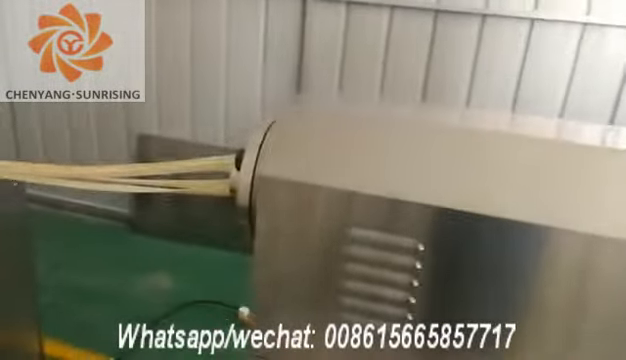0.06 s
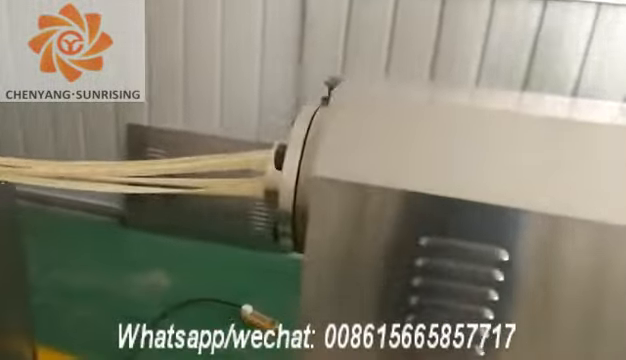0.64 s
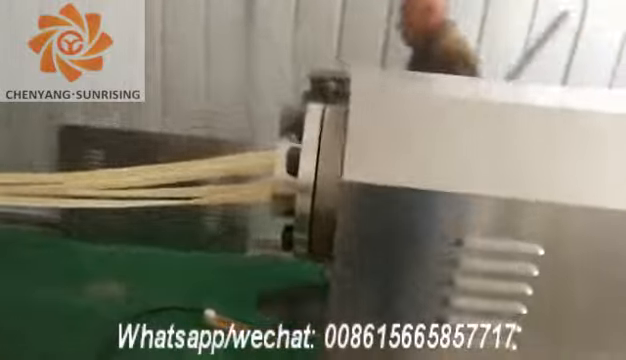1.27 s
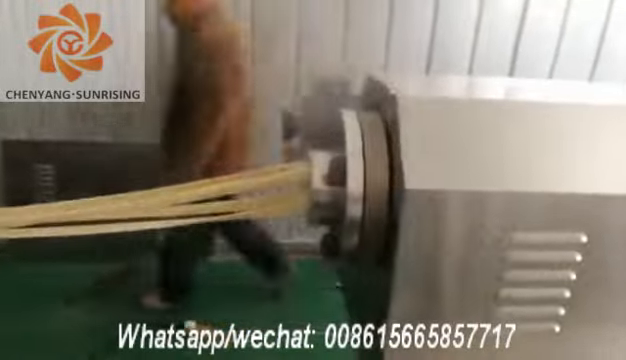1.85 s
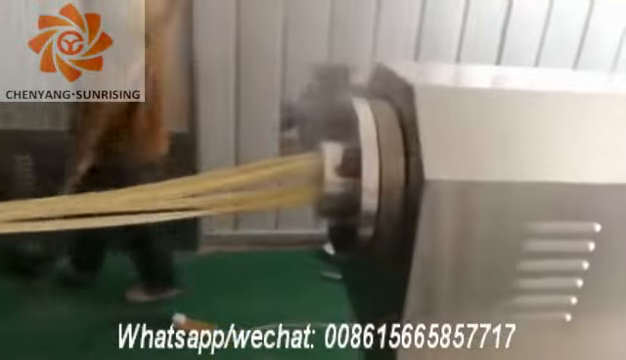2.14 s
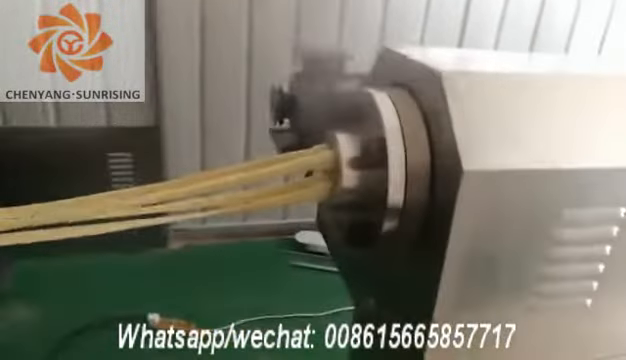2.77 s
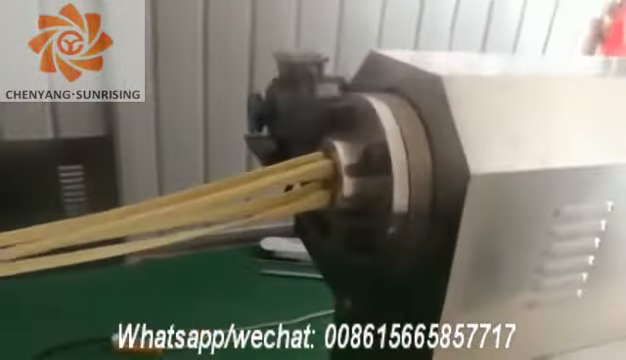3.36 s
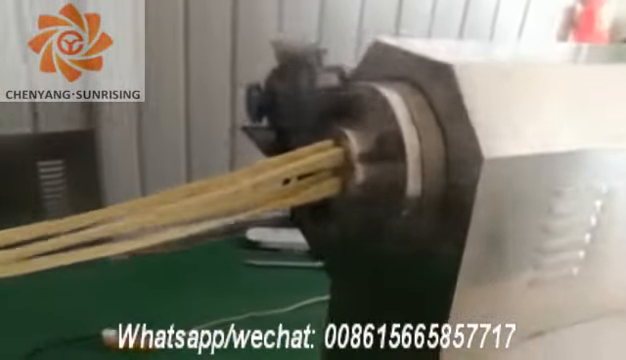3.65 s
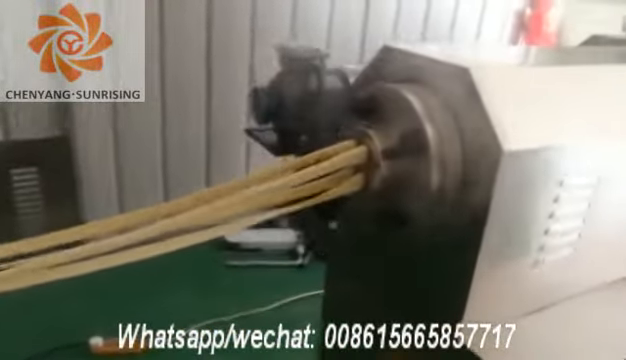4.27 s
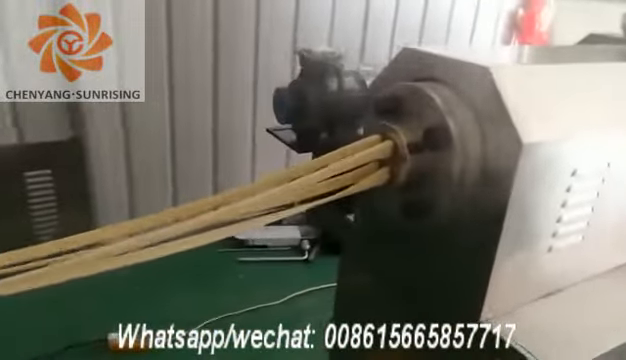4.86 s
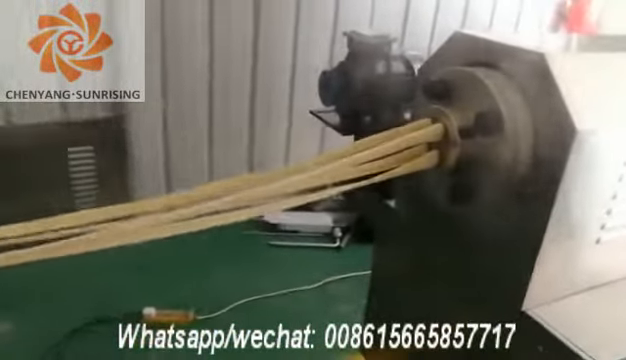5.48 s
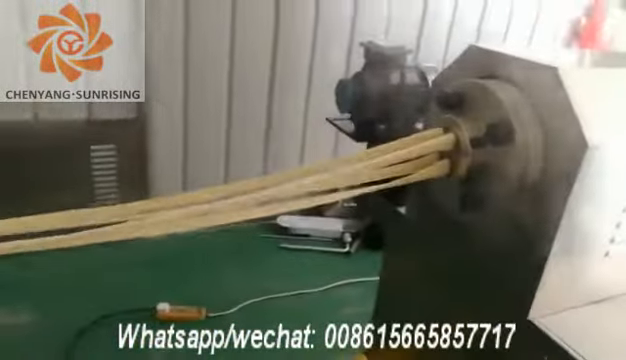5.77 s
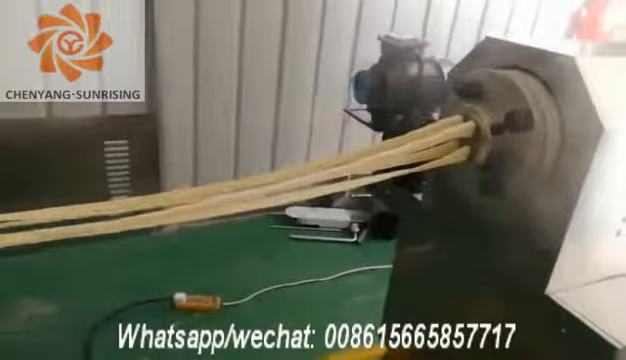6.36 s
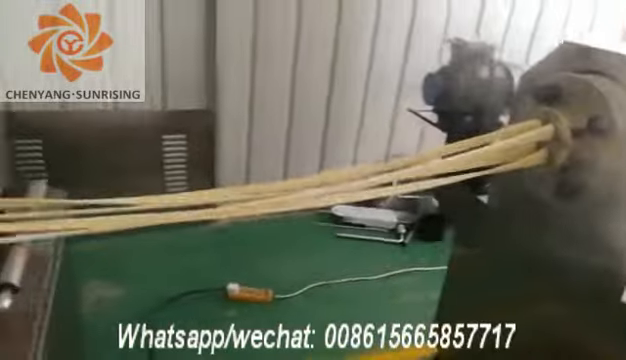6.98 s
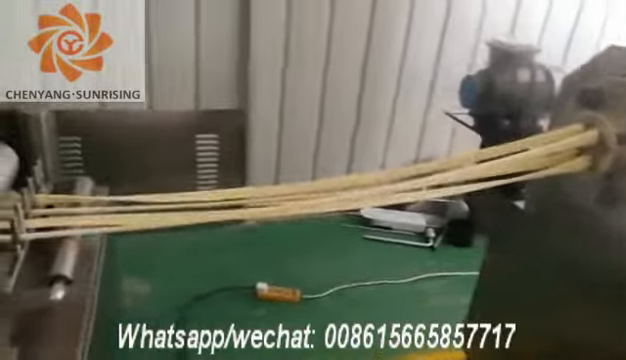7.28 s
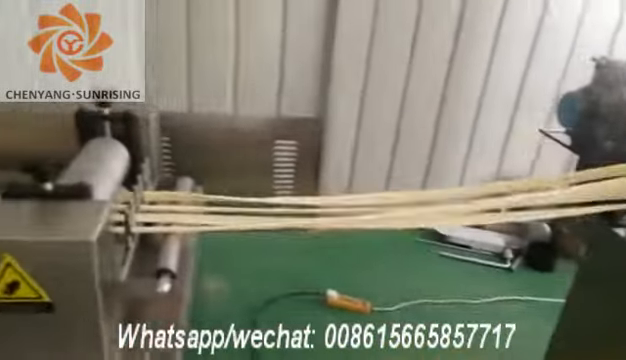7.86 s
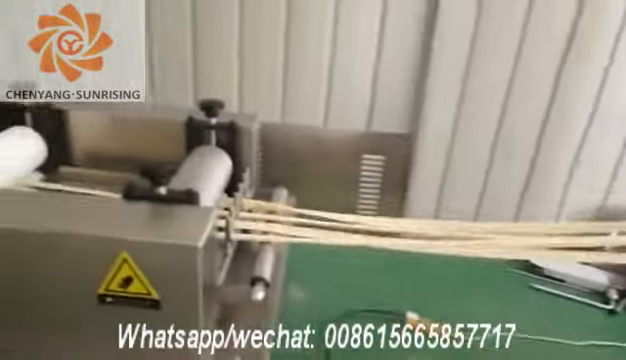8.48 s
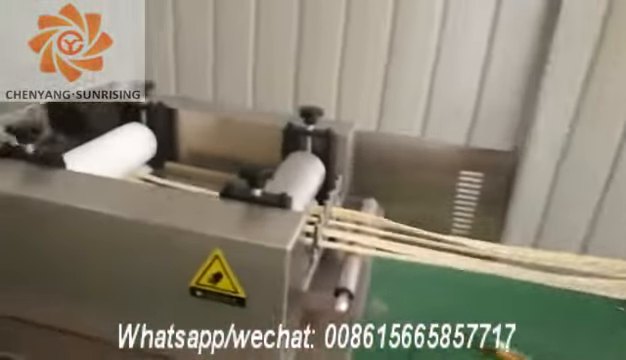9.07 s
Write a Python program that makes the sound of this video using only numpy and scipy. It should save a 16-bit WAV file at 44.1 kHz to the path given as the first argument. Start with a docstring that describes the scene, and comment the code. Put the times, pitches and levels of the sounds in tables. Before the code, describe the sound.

A piercing electric whine from a dough-extruding machine continues from start to finish, shimmering and shifting slightly in strength. Beneath it the drive drones, gears hum and steam sizzles lightly, all within the broad rumble of a factory hall. The microphone moves slowly near the machine, which sounds a little to the right, so its tones gently swell and fade.

```python
"""A high, buzzing whine near 4 kHz sits over the hum, rumble and hiss of a factory hall.
It comes from the motor of a snack extruder, a machine that pushes dough through a shaped opening (the die).
The motor's power supply switches rapidly, making a row of evenly spaced tones. Each swells and fades on
its own as two microphones move through the loud and quiet spots left by the hall's echoes.
Underneath, gears hum, the drive drones and steam hisses at the die."""
import sys
import numpy as np
from scipy import signal
from scipy.io import wavfile
from scipy.ndimage import uniform_filter1d

SR = 44100
rng = np.random.default_rng(int(sys.argv[2]) if len(sys.argv) > 2 else 0)


def unload_wav(signal):
    """Save mono or channel-first audio to the path in sys.argv[1] as 16-bit WAV at rate SR, clipped to [-1, 1]."""
    wavfile.write(
        sys.argv[1],
        SR,
        np.round(np.clip(np.atleast_2d(signal).T, -1, 1) * 32767).astype(np.int16),
    )


N = 402633
T = np.arange(N) / SR
WHINE_HZ, SPACING_HZ = 3972.6, 55.37  # a "step" is one spacing up or down from WHINE_HZ
WHINE_LAG_S = .00057  # the whine reaches the left microphone this much later


def gain_of(db):
    """Turns decibels into a number to multiply a sound by."""
    return 10 ** (np.asarray(db) / 20)

def evened(x):
    """Scales a signal to an average power of 1."""
    return x / np.sqrt(np.mean(abs(x) ** 2) + 1e-20)

def at_pitch(table, hz):
    """Looks up a frequency table, blending between rows on a musical (log) scale."""
    row_hz, value = np.transpose(table)
    return np.interp(np.log(hz + 1), np.log(row_hz), value)

def follow(table, t):
    """Looks up every column of a time table at the times t."""
    times, *columns = np.transpose(table)
    return np.array([np.interp(t, times, column) for column in columns])

def level(curve, t=T):
    """A level curve in dB at the times t."""
    return follow(curve, t)[0]

def band_db(hz, centre, width, order=4):
    """The shape of a flat-topped band in dB; a wider band spreads the same power thinner."""
    return -10 * np.log10(width * (1 + (2 * (hz - centre) / width) ** order))

def random_waves(*shape):
    """Waves of random strength and phase, as complex numbers."""
    return (rng.standard_normal(shape) + 1j * rng.standard_normal(shape)) / np.sqrt(2)

# How alike the two microphones sound: (frequency [Hz], likeness [0-1])
MIC_LIKENESS = [(100, .985), (190, .965), (280, .85), (450, .2), (1200, .25), (2000, 0), (5500, .1),
                (7000, .85), (8500, .94), (11000, .6), (14000, .45)]
def mic_pair(waves, hz):
    """Blends two unrelated signals into what two nearby microphones hear."""
    same = np.clip(at_pitch(MIC_LIKENESS, hz), 0, .999)
    return np.array([waves[0], same * waves[0] + np.sqrt(1 - same ** 2) * waves[1]])

# Which side is louder: (frequency [Hz], left minus right [dB])
MIC_BALANCE = [(120, 0.5), (700, -4), (1800, -1.5), (3000, -5.5), (5000, -10), (8000, -1), (13000, -.6)]
def sides(hz):
    """Left and right gain: the machine stands to the right."""
    return gain_of(np.multiply.outer([.5, -.5], at_pitch(MIC_BALANCE, hz)))[:, None]

def fading(rate_hz):
    """Times and two random flutters: 24 echoes add and cancel along a walk that is fastest at first."""
    t = np.linspace(0, T[-1], 1024)
    path = t + 2.614 * (1 - np.exp(-t / 2.242))
    doppler = rate_hz * rng.standard_normal((2, 24, 1))  # moving shifts each echo's pitch a little
    echoes = random_waves(*doppler.shape) * np.exp(2j * np.pi * doppler * path)
    return t, evened(echoes.sum(1))

def sine(hz, t, envelopes):
    """A pure tone at each microphone; a slow complex envelope sets its strength and phase."""
    phase = (2 * np.pi * (hz * T % 1)).astype(np.float32)
    cos, sin = np.cos(phase), np.sin(phase)
    channels = [np.interp(T, t, z.real) * cos - np.interp(T, t, z.imag) * sin for z in envelopes]
    return np.sqrt(2) * np.array(channels)

def hall_tone(hz, db, direct, rate_hz, lag_s=0.):
    """A machine tone: a steady direct part, lag_s later on the left, plus its fading echoes."""
    t, echoes = fading(rate_hz)
    arrival = np.exp(2j * np.pi * (rng.random() - hz * np.array([[lag_s], [0]])))
    envelopes = evened(mic_pair(direct * arrival + echoes, hz))
    return gain_of(db) * sine(hz, t, envelopes)

def noise(shape_db, patchy_db, size=1024):
    """Stereo noise of power 1, shaped by shape_db(t, hz), with random louder and softer patches."""
    hz = np.fft.rfftfreq(size, 1 / SR)
    t = np.arange(N * 4 // size + 5) * size / 4 / SR
    patches = uniform_filter1d(rng.standard_normal((len(t), len(hz))), size=12, axis=0)
    patches = evened(uniform_filter1d(patches, size=12, axis=1))
    spectrum = mic_pair(random_waves(2, len(t), len(hz)), hz)
    spectrum = spectrum * gain_of(shape_db(t, hz) + patchy_db * patches) * sides(hz)
    _, sound = signal.istft(spectrum.swapaxes(1, 2), nperseg=size, noverlap=size * 3 // 4)
    return evened(sound[:, :N])


# One short puff of hiss: (time [s], half-width [s], midrange lift [dB], fizz lift [dB])
HISS_PUFF = (3.1, 0.063, 4.1, 5.1)
def puff(t):
    """How far the puff lifts the hall's midrange and the steam's fizz, in dB."""
    at, half_width, mid_db, fizz_db = HISS_PUFF
    return np.multiply.outer([mid_db, fizz_db], np.exp(-((t - at) / half_width) ** 2))

# Machine noise filling the hall: (frequency [Hz], relative level [dB])
HALL_SPECTRUM = [(20, -17), (45, -61), (75, -3), (130, -16), (175, -1.5), (280, -5.5), (500, -14),
                 (720, -12), (1000, -14.5), (2200, -15), (3200, -16), (5600, -21.5), (9000, -32.5),
                 (15500, -45)]
# Swells of the low rumble and the drone: (time [s], level change [dB])
RUMBLE_SWELL = [(0.0, -1), (0.6, -1.5), (2.84, 1), (3.04, -2.5), (3.79, 2.5), (4.29, -1), (6.74, 1.9),
                (7.28, -1.5), (9.13, 0.3)]
# Swells of the higher machine noise and the hum: (time [s], level change [dB])
MACHINERY_SWELL = [(0.0, -0.5), (2.74, 1.5), (5.19, -0.3), (6.69, 1.2), (7.43, -0.5), (9.13, 0.6)]
def hall():
    """Rumble and broad machine noise, each swelling as the microphones pass."""
    def shape_db(t, hz):
        rumble_db = level(RUMBLE_SWELL, t) - 4
        machinery_db = level(MACHINERY_SWELL, t) + puff(t)[0]
        low = 1 / (1 + (hz / 380) ** 4)  # 1 in the bass, 0 in the treble
        return at_pitch(HALL_SPECTRUM, hz) + low * rumble_db[:, None] + (1 - low) * machinery_db[:, None]
    return gain_of(-32) * noise(shape_db, patchy_db=1.5, size=2048)

# Low tones of the drive and frame: (frequency [Hz], relative level [dB])
DRONE_TONES = [(116, -52), (146, -46), (167, -44), (179, -45), (220, -54), (291, -49)]
def drone(recede_db_per_s=.47):
    """Low tones waver with the uneven load on the dough screws and fade as the walk leaves the drive."""
    tones = sum(hall_tone(hz, db, direct=.37, rate_hz=2.2) for hz, db in DRONE_TONES)
    return gain_of(.77 * level(RUMBLE_SWELL) - recede_db_per_s * T) * tones

# Steam hiss at the die: (frequency [Hz], relative level [dB])
STEAM_SPECTRUM = [(4000, -34), (6400, -12.5), (7000, -4.5), (7500, -1.5), (7950, -3), (8700, -5),
                  (9400, -12.5), (10500, -20), (12000, -22.3), (15500, -28)]
# Sizzle near 8 kHz; the hiss bands and the whine's octave follow it too: (time [s], level change [dB])
SIZZLE_SWELL = [(0.0, -0.5), (1.85, -0.2), (2.05, -3), (2.39, -0.5), (5.14, -3), (5.49, 1), (5.99, -1.5),
                (6.79, 1.5), (7.13, -1), (9.13, -2)]
# The highest fizz, blocked by the casing at first: (time [s], level change [dB])
FIZZ_SWELL = [(0, -4), (2.1, -4), (2.4, -1.5), (3.5, .3), (4, 2.3), (5.1, 2.5), (5.7, .8), (6.6, 3),
              (7.2, -.5), (8.4, .8), (9.13, 0)]
def steam(flicker_db=1.6):
    """Steam bursts unevenly off the strands of dough; its fizz is clearest in front of the die."""
    def shape_db(t, hz):
        flicker = evened(uniform_filter1d(rng.standard_normal((len(t), 1)), size=8, axis=0))
        fizz_db = (level(FIZZ_SWELL, t) + puff(t)[1])[:, None] + flicker_db * flicker
        sizzle_db = level(SIZZLE_SWELL, t)[:, None]
        fizz_share = at_pitch([(8500, .28), (11000, .95)], hz)
        return at_pitch(STEAM_SPECTRUM, hz) + (1 - fizz_share) * sizzle_db + fizz_share * fizz_db
    return gain_of(-35.2) * noise(shape_db, patchy_db=1.8)

# Gearbox tones, strongest near multiples of 15 teeth: (cycles per shaft turn, relative level [dB])
GEAR_TONES = [(16, -58), (24, -56), (29, -56), (30, -49.5), (31, -53), (33, -55), (34, -56), (36, -57),
              (45, -49), (46, -53), (49, -55), (60, -52.5), (72, -56), (75, -54), (77, -57)]
# Faint steady tones, including one low sideband of the whine: (frequency [Hz], relative level [dB])
STEADY_TONES = [(553, -54), (629.5, -55), (2589, -56), (3455, -51), (3511, -47), (3726, -47), (4110, -43),
                (4546, -49), (5954, -54), (6051, -55), (8407, -52)]
def hum(shaft_hz=24.4):
    """Gear teeth meet and hum at multiples of the shaft's speed, among faint tones of steady pitch."""
    gears = sum(hall_tone(k * shaft_hz, db, direct=.6, rate_hz=1.2, lag_s=WHINE_LAG_S / 2)
                * sides(k * shaft_hz) for k, db in GEAR_TONES)
    others = sum(hall_tone(hz, db, direct=.32, rate_hz=1.5) * sides(hz) for hz, db in STEADY_TONES)
    return (gain_of(1) * gears + gain_of(.5) * others) * gain_of(level(MACHINERY_SWELL))

# A high gear tone and two thin motor whistles, each: (time [s], relative level [dB])
HIGH_GEAR_SWELL = [(0.0, -59), (1.12, -47), (2.36, -57), (2.96, -48), (3.56, -43.5), (4.52, -68),
                   (5.88, -45), (9.12, -52.5)]
WHISTLE_SWELL = [(0, -53), (2.56, -53), (2.88, -46), (3.3, -54), (4.4, -44), (5.4, -53), (9.13, -51)]
HIGH_WHISTLE_SWELL = [(0, -47.5), (3, -43), (3.8, -58), (6, -49), (9.13, -48)]
def held_tones():
    """Three tones arrive mostly straight from the machine, so they swell slowly instead of flickering."""
    held = [(1146.8, HIGH_GEAR_SWELL), (2755.5, WHISTLE_SWELL), (5943, HIGH_WHISTLE_SWELL)]
    tones = sum(hall_tone(hz, level(curve), direct=1.7, rate_hz=.9, lag_s=WHINE_LAG_S / 5) * sides(hz)
                for hz, curve in held)
    return gain_of(-1) * tones

# How the ring comes and goes: (time [s], level change before scaling by swell [dB])
RING_SWELL = [(0.0, -3.5), (0.65, 4.5), (0.85, -10), (1.4, 1.5), (2.64, -0.5), (3.24, 3.5), (3.54, 0),
              (3.84, 3), (5.29, -5), (5.49, 0), (6.29, 2), (7.75, 0), (7.96, 3), (8.4, -0.5)]
def ring(centre_hz=1500, width_hz=32, swell=1.44):
    """A very narrow band of noise, heard as a fuzzy mid-pitched ring."""
    band = noise(lambda t, hz: band_db(hz, centre_hz, width_hz), patchy_db=1.5, size=2048)
    return gain_of(-46 + swell * level(RING_SWELL)) * band

# Narrow bands of hiss: (frequency [Hz], width [Hz], relative level [dB])
HISS_BANDS = [(1133, 45, -52), (1767, 73, -58.5), (3570, 200, -44), (4160, 780, -38.3), (6050, 540, -47.5),
              (7930, 320, -43.5), (11920, 330, -62)]
def hiss_bands():
    """Narrow bands of hiss, the highest at three times the whine's frequency (its third harmonic)."""
    def shape_db(t, hz):
        power = sum(gain_of(db + band_db(hz, centre, width)) ** 2 for centre, width, db in HISS_BANDS)
        return 10 * np.log10(power)
    return gain_of(-32.35 + .5 * level(SIZZLE_SWELL)) * noise(shape_db, patchy_db=2.5)

def rasp(centre_hz=3970, width_hz=310):
    """Uneven switching leaves a band of noise under the whine, throbbing at twice the tone spacing."""
    band = noise(lambda t, hz: band_db(hz, centre_hz, width_hz, order=8), patchy_db=-.5)
    throb = evened(1 + .25 * np.cos(2 * np.pi * 2 * SPACING_HZ * T))
    return gain_of(-30.2 + .5 * whine_swell_db()) * band * throb

# Faint whine tones, one per free step from -21 upward: (relative level [dB])
FAINT_TONES = [-59, -58, -55, -62, -60, -53, -61, -59, -55, -53, -48, -53, -43, -38, -44, -37, -50, -30,
               -31, -31, -38, -41, -36.5, -42, -41, -48, -47, -49, -57, -49, -56]
# Tones about an octave above the whine, one per step upward: (relative level [dB])
OCTAVE_TONES = [-54, -49, -49, -46, -43, -41, -49, -48, -57, -46.5, -48, -48]
def faint_whine(octave_hz=7890.3):
    """Switching also makes rows of weaker tones (sidebands) around the whine and around its octave."""
    free_steps = [k for k in range(-21, 17) if k not in SIDE_STEPS + MAIN_STEPS]
    row = sum(hall_tone(WHINE_HZ + k * SPACING_HZ, db, direct=.7, rate_hz=1., lag_s=WHINE_LAG_S)
              for k, db in zip(free_steps, FAINT_TONES))
    octave = sum(hall_tone(octave_hz + k * SPACING_HZ, db, direct=1., rate_hz=1.5)
                 for k, db in enumerate(OCTAVE_TONES, start=-5))
    return (row * gain_of(-1.9 + .4 * whine_swell_db()) * sides(WHINE_HZ)
            + octave * gain_of(-1 + level(SIZZLE_SWELL)) * sides(octave_hz))

SIDE_STEPS = (-5, 2, 9)
# The tones on those steps, at the right microphone, each: (time [s], relative level [dB])
LOW_SIDE_SWELL = [(0, -30), (2.52, -35), (5.08, -34), (5.84, -23), (6.24, -38), (6.8, -29), (9.13, -36)]
NEAR_SIDE_SWELL = [(.1, -19), (.32, -27), (2.36, -32), (2.64, -21), (5.16, -33), (5.52, -22), (6.36, -24),
                   (6.52, -33), (7.08, -20), (7.64, -27.5)]
HIGH_SIDE_SWELL = [(.28, -37), (2.36, -41), (6.6, -40), (7, -29), (7.7, -40)]
def side_whine():
    """Three switching tones beside the whine tilt its pitch down or up as they grow louder."""
    curves = (LOW_SIDE_SWELL, NEAR_SIDE_SWELL, HIGH_SIDE_SWELL)
    tones = sum(hall_tone(WHINE_HZ + k * SPACING_HZ, level(curve), direct=2.5, rate_hz=1.,
                          lag_s=WHINE_LAG_S) for k, curve in zip(SIDE_STEPS, curves))
    balance = sides(WHINE_HZ)
    return gain_of(-.2) * tones * balance / balance[1]

# Where the three loudest tones sit: (distance from WHINE_HZ [steps])
MAIN_STEPS = (-2, 0, 1)
# Each one along the walk: (time [s], relative left [dB], relative right [dB], left phase lead [rad])
LOWER_TONE = [(0.0, -28.5, -20.5, 4.8), (0.35, -36.5, -27.5, -2.1), (0.67, -15.0, -21.5, -1.9),
              (0.82, -22, -14.5, -0.6), (0.98, -27, -20, -1.6), (1.5, -19.0, -18.0, -2.2),
              (1.7, -30, -15.5, -5.4), (2.24, -31.5, -26.0, 1.8), (2.7, -27, -31, -6.0),
              (2.93, -26.5, -20.5, -2.2), (3.04, -33.5, -30.5, -5.3), (3.34, -17.0, -18.0, -7.6),
              (3.75, -26, -13.5, -12.4), (3.97, -33, -28, -9.0), (4.12, -28, -20, -7.6),
              (4.72, -19.5, -18, -9.4), (5.04, -28.0, -16.0, -10.1), (5.3, -30.0, -26.5, -7.1),
              (5.82, -26.5, -21.0, -12.5), (6.61, -27, -38, -6.6), (6.99, -34.5, -23.5, -9.3),
              (7.47, -30.5, -17.5, -10.8), (8.38, -32.0, -19.5, -7.9), (8.77, -22.0, -34.0, -6.3),
              (9.13, -31.0, -22.0, -9.2)]
MIDDLE_TONE = [(0.0, -26.5, -31.0, 2.0), (0.16, -35.5, -18.5, -1.8), (0.8, -24.5, -24, -0.7),
               (0.98, -30, -14, -5.4), (1.24, -24.5, -23, -1.1), (1.6, -17.5, -27.0, -2.4),
               (2.09, -33.5, -14.5, -1.2), (2.45, -21.5, -32.5, 2.4), (2.57, -35.0, -19.0, 1.7),
               (3.09, -19.0, -24.0, 7.9), (3.95, -30, -24, 2.6), (4.3, -27, -19.5, 2.8),
               (5.22, -23.5, -23.0, 2.0), (5.77, -23.0, -22.5, 6.9), (6.22, -32, -16.5, 7.0),
               (6.55, -21.5, -24.5, 10.5), (6.89, -31.5, -15.5, 12.1), (7.2, -23.0, -23.5, 13.0),
               (7.63, -36.0, -16.5, 13.3), (7.99, -18, -17, 13.1), (8.39, -33.5, -23.0, 14.0),
               (8.57, -33.0, -15.5, 12.9), (9.13, -27, -19.5, 10.0)]
UPPER_TONE = [(0.0, -26.5, -33.0, 2.6), (0.46, -37.0, -21.0, -8.6), (0.88, -25.5, -22.5, 0.6),
              (1.35, -37.0, -24.0, 2.2), (1.64, -21.0, -21.0, -2.6), (1.96, -40.5, -22.5, -6.4),
              (2.43, -18.5, -20.0, -7.9), (2.68, -32.5, -31.5, -7.5), (3.2, -28.5, -22.0, -6.9),
              (4.34, -30.0, -23.0, -13.0), (4.44, -26.0, -36.0, -13.1), (5.43, -39.0, -19.0, -18.6),
              (5.51, -41.0, -13.5, -17.0), (5.72, -27.0, -23.0, -25.2), (6.44, -34.5, -26.0, -19.1),
              (7.13, -28.0, -25.5, -23.9), (8.12, -41.0, -27.0, -22.8), (8.61, -28.0, -20.5, -27.6),
              (9.13, -30.5, -25.0, -26.0)]
MAIN_TONES = (LOWER_TONE, MIDDLE_TONE, UPPER_TONE)
def main_whine(settle_s=5., tremble_hz=12.):
    """The strongest switching tones: one alone whistles, two or three beat together into a buzz."""
    whine = 0
    for step, walk in zip(MAIN_STEPS, MAIN_TONES):
        t, echoes = fading(3.)
        left_db, right_db, lead = follow(walk, t)
        drift = 2 * np.pi * rng.random() + 2 * fading(.5)[1][0].real
        envelopes = gain_of([left_db, right_db]) * np.exp(1j * np.array([drift + lead, drift]))
        ruffle = .3 * np.exp(-t / settle_s) * echoes  # echoes ruffle the tone less as the walk slows
        tremble = .14 * fading(tremble_hz)[1][0]  # from the motor's changing load
        whine = whine + sine(WHINE_HZ + step * SPACING_HZ, t, envelopes * evened(1 + ruffle + tremble))
    return gain_of(.5) * whine

def whine_swell_db():
    """How far the three loudest tones together are above their average, in dB."""
    power = sum((gain_of(follow(walk, T)[:2]) ** 2).sum(0) for walk in MAIN_TONES)
    return 10 * np.log10(power / power.mean())

# One brief dip in the whine: (time [s], half-width [s], level change [dB])
WHINE_DIP = (4.528, 0.0072, -7)
def motor_whine(waver_db=.45, shiver_db=.75):
    """All parts of the whine together; its level wavers, shivers and dips once."""
    t, slow = fading(3.)
    _, quick = fading(9.)
    wobble_db = np.interp(T, t, waver_db * slow[0].real + shiver_db * quick[0].real)
    at, half_width, depth_db = WHINE_DIP
    dip_db = depth_db * np.exp(-((T - at) / half_width) ** 2)
    return (main_whine() + side_whine() + faint_whine() + rasp()) * gain_of(wobble_db + dip_db)

def scene():
    """The extruder runs steadily, its motor whining above everything else."""
    return motor_whine() + hiss_bands() + ring() + hum() + held_tones() + drone() + hall() + steam()

def record(dry):
    """Cuts away the very highest treble, above 15650 Hz."""
    lowpass = signal.firwin(511, 15650, window=("kaiser", 9), fs=SR)
    return signal.oaconvolve(dry, lowpass[None], "same")


dry = scene()
out = record(dry)
unload_wav(out)
```